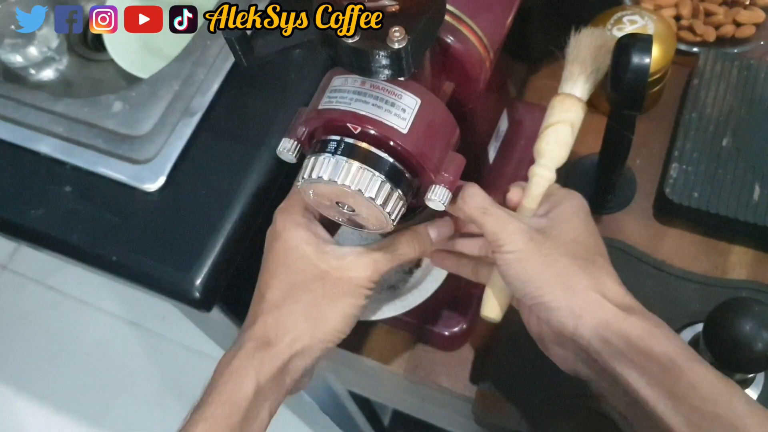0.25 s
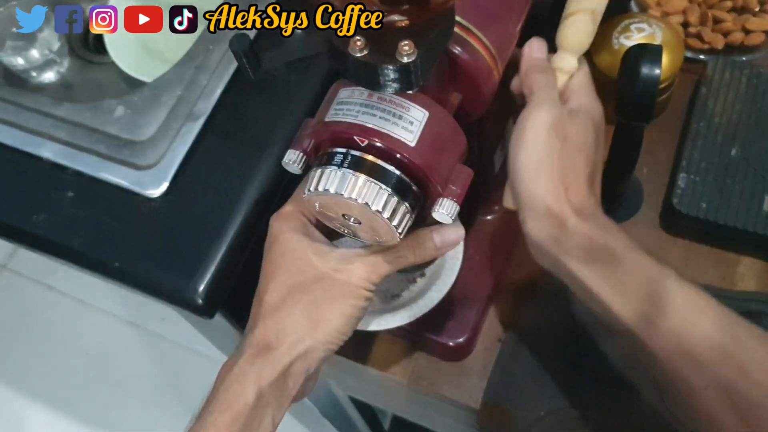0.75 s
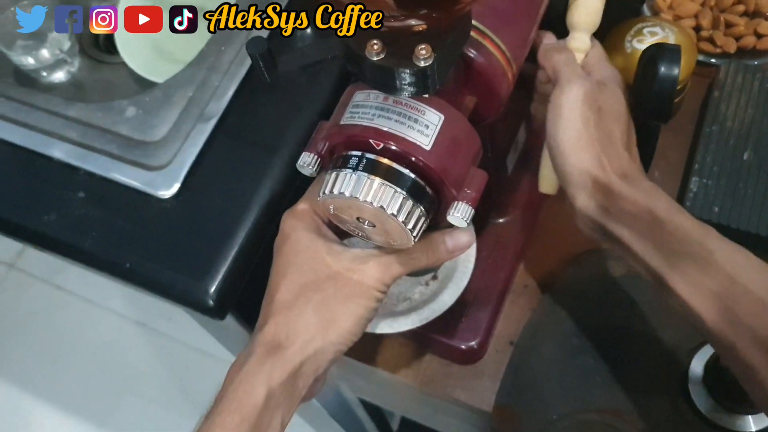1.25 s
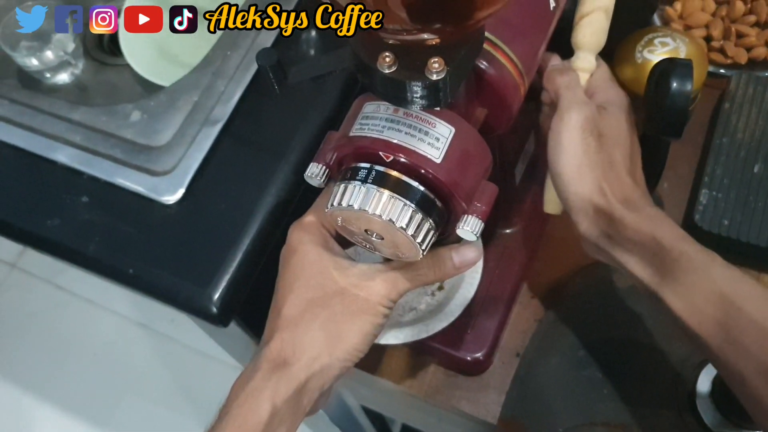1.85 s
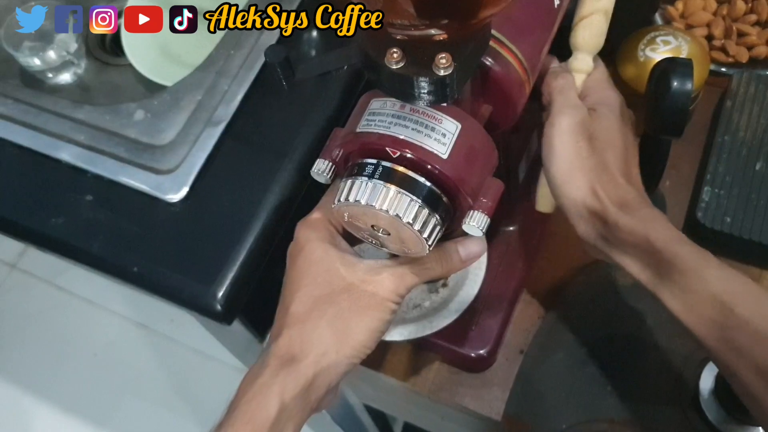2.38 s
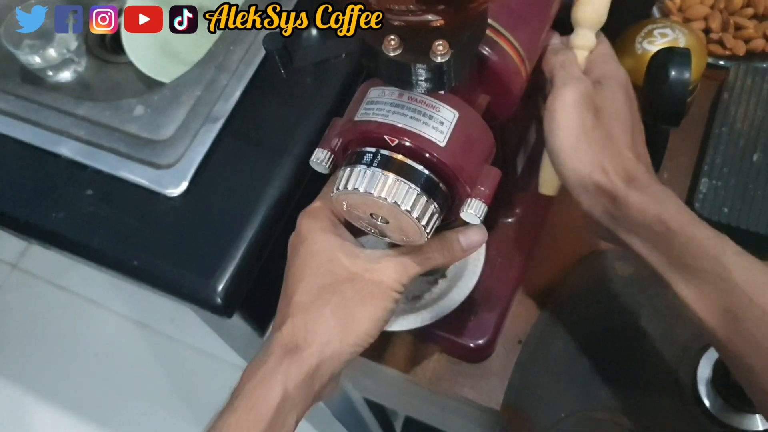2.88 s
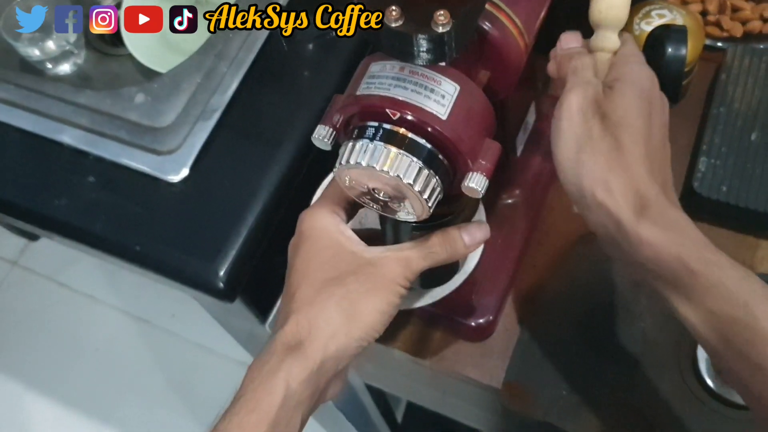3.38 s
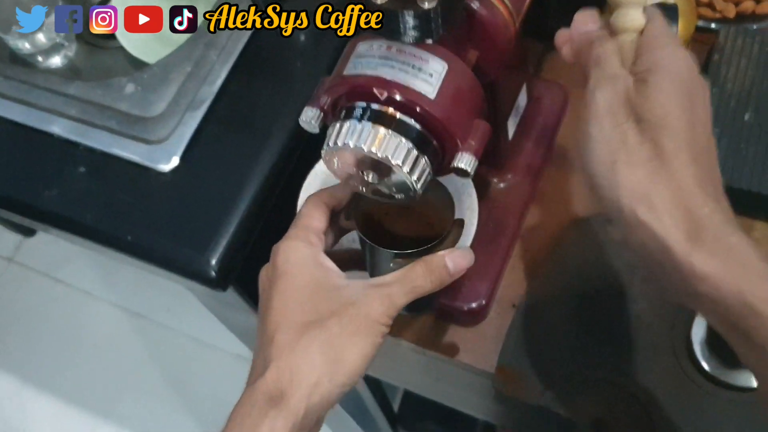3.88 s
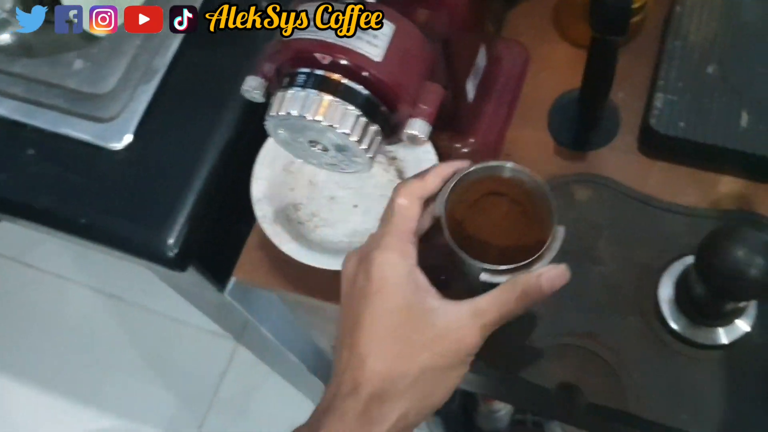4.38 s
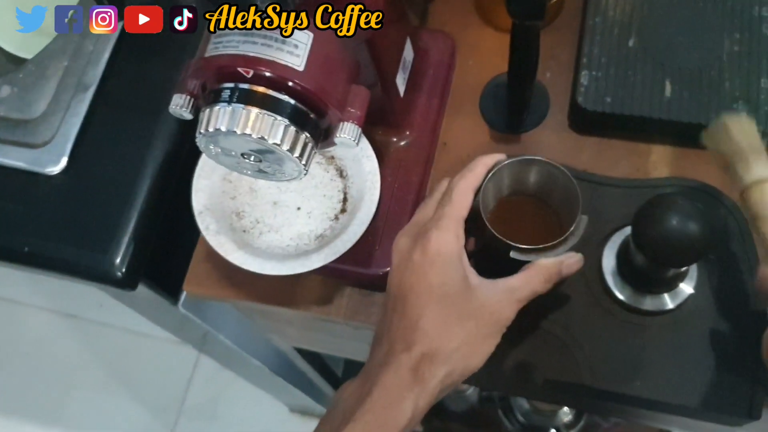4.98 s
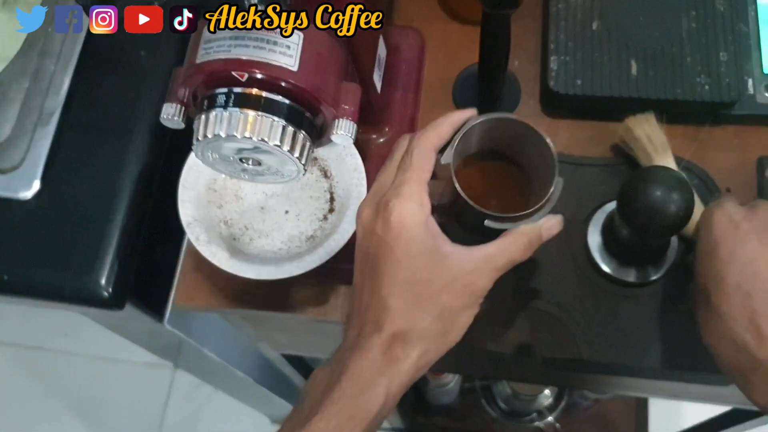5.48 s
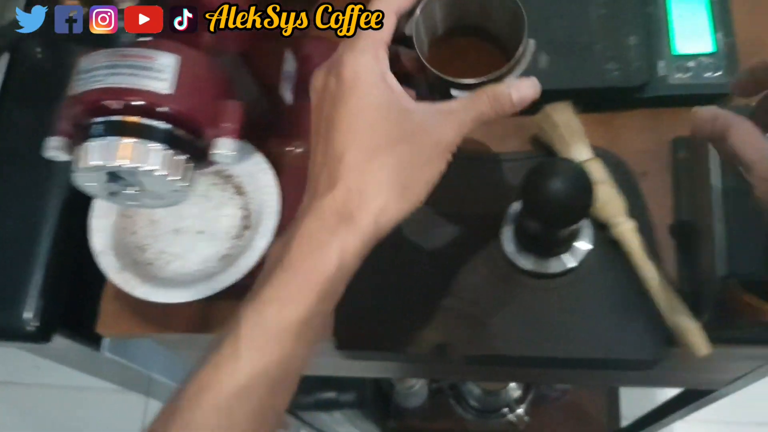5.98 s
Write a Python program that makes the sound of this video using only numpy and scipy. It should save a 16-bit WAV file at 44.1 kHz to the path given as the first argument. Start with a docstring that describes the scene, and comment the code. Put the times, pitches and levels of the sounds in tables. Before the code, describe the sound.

A quiet kitchen with soft low rumble and faint hiss, heard close in stereo with hard-room reflections. Around 0.35-0.5 s hands rustle and tiny bumps touch the grinder chute; another small bump comes at 0.9. A finger lightly touches the switch at 1.25, then it snaps loudly at 1.37. The small motor surges with a rough rumble, reaching full speed within a few tenths: steady buzzing whine, bright brush hiss, mains hum, nearly empty. At 2.43 an even sharper snap cuts the power. The hum dies at once and the whine glides steadily down, swelling through resonances, thinning into a slowing rattle and stopping by about 4.2. At 4.75 a steel cup knocks the counter hard with a doubled thud and short ring, then more softly at 4.93. Between 5.2 and 5.5 a wooden brush handle taps the counter, loudest at 5.42. Faint ticks and a low handling rustle finish near 6.

```python
"""In a hard kitchen, the small mains motor of a coffee grinder starts, runs nearly empty and coasts to rest.
Its whine is a set of sines tied to the rotor angle; filtered noise makes the brush hiss, rumble and shudder,
and steady sines make the mains hum. Clicks and noise puffs ring decaying sines for the switch, the steel cup
knocked twice on the counter (the first knock lands double), the chute and a wooden brush; hands rustle as
swells of noise, over a quiet bed of air noise."""
import sys
import numpy as np
from scipy import signal
from scipy.fft import rfft, irfft
from scipy.io import wavfile

SR = 44100
rng = np.random.default_rng(int(sys.argv[2]) if len(sys.argv) > 2 else 0)


def volts_from_decibels(level):
    """Turn decibel levels (scalar or array-like) into linear amplitude factors."""
    exponent = np.asarray(level, float) / 20
    return 10 ** exponent


def transcribe(signal):
    """Save signal, clipped to [-1, 1], as a 16-bit WAV file at the path in sys.argv[1]."""
    frames = np.atleast_2d(signal).T
    limited = np.clip(frames, -1, 1)
    pcm = np.round(limited * 32767).astype(np.int16)
    wavfile.write(sys.argv[1], SR, pcm)


N = 275163
T = np.arange(N) / SR   # time [s]
ON_S, OFF_S = 1.367, 2.435   # motor current on and off [s]
FULL_HZ = 553   # full speed: commutator bars passing per second, twelve bars a turn

# resonances of the switch and its shell: (frequency [Hz], level [dB], time to fall 60 dB [s])
SHELL = [(540, -7, 0.021), (967, -11.5, 0.017), (2100, 1, 0.0075), (2600, 4, 0.0017), (3570, -8.5, 0.012),
         (4154, -4.5, 0.0028), (5900, -3, 0.0034), (8750, -18.5, 0.0044)]


def rms_one(x):
    """Scale to an rms of 1."""
    return x / np.sqrt(np.mean(x ** 2) + 1e-20)


def at_hz(points, hz):
    """Read the second column of a table at any frequency, on a log frequency axis."""
    points = np.array(points)
    return np.interp(np.log(hz + 0.0019), np.log(points[:, 0]), points[:, 1])


def drift(rate):
    """Random wander of spread about 1: straight lines between random points, rate points per second."""
    knots = np.arange(-1, N / SR * rate + 2)
    return np.interp(T * rate, knots, rng.standard_normal(len(knots))) * np.sqrt(3 / 2)


def ring(clicks, hz, t60):
    """A resonance: each unit click starts a sine of height about 1 that falls 60 dB in t60 seconds."""
    radius = volts_from_decibels(-60 / (t60 * SR))
    step = 2 * np.pi * hz / SR
    return signal.lfilter([0, np.sin(step)], [1, -2 * radius * np.cos(step), radius ** 2], clicks + 1e-18)


def cut(x, hz, kind, order=2):
    """Butterworth filter that keeps the low, high or band part of a sound."""
    sos = signal.butter(order, np.clip(hz, 10, 20000), kind, fs=SR, output="sos")
    return signal.sosfilt(sos, x)


def pan(x, db):
    """Place a sound by making left louder than right by db."""
    return x * volts_from_decibels(np.array([[db / 2], [-db / 2]]))


def widen(mid, side):
    """Mix a common and an unrelated noise into left and right, less alike in the treble."""
    # how alike left and right are: (frequency [Hz], likeness [-1 to 1])
    likeness = [(60, .92), (400, .9), (800, .6), (1300, 0), (2200, .45), (4000, -.1), (12000, -.2)]
    alike = np.clip(at_hz(likeness, np.fft.rfftfreq(mid.shape[-1], 1 / SR)), -1, 1)
    common = rfft(mid) * np.sqrt((1 + alike) / 2)
    unlike = rfft(side) * np.sqrt((1 - alike) / 2)
    return irfft(np.array([common + unlike, common - unlike]), mid.shape[-1])


def taps(events, modes, pan_db=0.0, crack_db=-17.0):
    """A click and a short puff of noise, as bright as the contact is hard, ring a body and are heard bare too."""
    out = np.zeros(N)
    for start, db, low_hz, high_hz, contact in events:
        puff = rng.standard_normal(8000) * np.exp(-np.arange(8000) / SR / contact)
        puff[0] = np.sqrt(contact * SR)   # the click carries most of the energy
        puff = cut(puff, [low_hz, high_hz], "band", order=3)
        body = 0
        for k, (hz, level_db, t60) in enumerate(modes):
            body = body + volts_from_decibels(level_db) * ring(puff, hz, t60) * (-1) ** k   # neighbours in opposite phase
        tap = body / np.abs(body).max() + volts_from_decibels(crack_db) * puff / np.abs(puff).max()
        at = round(start * SR)
        out[at:at + 8000] += volts_from_decibels(db) * tap
    return pan(out, pan_db)


def air():
    """Distant rumble of the house and hiss of the microphone: noise shaped by a spectrum table."""
    # spectrum of the air noise: (frequency [Hz], relative level [dB per Hz])
    spectrum = [(15, -30.5), (25, -20), (53, -3), (70, -21), (87, -1), (166, -3), (229, 6), (263, -9.5),
                (427, -6), (503, -10.5), (591, -10.5), (734, -15), (3340, -35), (8500, -41), (12000, -34.5),
                (16000, -35.5)]
    shape = volts_from_decibels(at_hz(spectrum, np.fft.rfftfreq(N, 1 / SR)))
    noise = irfft(rfft(rng.standard_normal((2, N))) * shape, N)
    low = cut(noise, 1100, "low") * volts_from_decibels(2.9 * drift(2.7))   # the rumble swells and sinks
    high = cut(noise, 840, "high")
    return pan(volts_from_decibels(-63) * rms_one(widen(*(low + high))), -1.6)


def rustles():
    """Hands and bristles rustle: bands of grainy noise that swell and fade."""
    # rustles: (middle [s], length [s], level at the top of the swell [dB], low edge [Hz], high edge [Hz])
    swells = [(0.356, 0.021, -53.5, 367.2, 444.4), (0.379, 0.034, -50, 414, 636),
              (0.48, 0.1, -65, 800, 2360), (0.96, 0.12, -74.5, 658.8, 2592), (7.7, 0.13, -69, 1200, 2160),
              (3.34, 0.068, -63, 7407, 8800), (5.675, 0.14, -73, 5300, 15000),
              (5.946, 0.1, -74.5, 1300, 2200), (6.076, 0.16, -57.5, 38.89, 83)]
    out = 0
    grains = rng.standard_normal((2, N)) * volts_from_decibels(2 * drift(150))
    for middle, length, db, low_hz, high_hz in swells:
        noise = rms_one(cut(grains, [low_hz, high_hz], "band"))
        out = out + volts_from_decibels(db) * noise * np.exp(-(2 * (T - middle) / length) ** 2)
    return out


def chute_bumps():
    """Small bumps ring the grinder's chute."""
    # bumps: (time [s], level [dB], contact low edge [Hz], contact high edge [Hz], contact decay [s])
    bumps = [(.369, -52, 2600, 8000, 0.0018), (.376, -43, 2640, 13000, .003), (.43, -40, 336, 2600, .012),
             (.451, -45, 500, 2000, .02), (.877, -46, 130, 700, 0.0036), (1.643, -33.5, 300, 800, .002),
             (2.231, -33, 304, 700, .002)]
    # resonances of the chute: (frequency [Hz], level [dB], time to fall 60 dB [s])
    chute = [(200, 0.5, 0.04), (490, -3, 0.012), (700, -9.5, .05), (1080, -3.5, 0.0037), (1550, -7, .008),
             (2010, -11.5, 0.021), (2850, -13, .005), (5700, -8, 0.0016), (9000, -11.5, 0.0011)]
    return taps(bumps, chute)


def finger_touch():
    """A finger lands on the switch: a puff of noise is heard as strongly as the ringing shell."""
    # touch: (time [s], level [dB], contact low edge [Hz], contact high edge [Hz], contact decay [s])
    touch = [(1.245, -32.5, 1000, 15670, 0.0066)]
    return taps(touch, SHELL, crack_db=0.0)


def switch():
    """The rocker snaps over in a short rattle that rings its shell and cracks across all pitches."""
    # rocker switched on and off: (time [s], level [dB], left over right [dB])
    snaps = [(1.366, -8.5, -1), (2.433, -6.5, -0.5)]
    out = np.zeros((2, N))
    for start, db, pan_db in snaps:
        after = np.maximum(T - start, 0)
        burst = rng.standard_normal((2, N)) * after * np.exp(-after / 0.002)
        burst[:, round((start + .0015) * SR)] = .008   # the spring lands with one hard click
        snap = 0
        for k, (hz, level_db, t60) in enumerate(SHELL):
            snap = snap + volts_from_decibels(level_db) * ring(burst[0], hz, t60) * (-1) ** k
        crack = cut(burst[1], [1200, 12000], "band", order=1)
        both = snap / np.abs(snap).max() + volts_from_decibels(3.5) * crack / np.abs(crack).max()
        out += pan(volts_from_decibels(db) * both, pan_db)
    return out


def bars_hz():
    """Rotor speed in bars per second: it closes in on full speed, then friction and drag slow it."""
    # shortfall after switching on, dying in three stages: (shortfall [bars per s], time constant [s])
    spin_up = [(363, .015), (184, .095), (6, .5)]
    since_on = np.maximum(T - ON_S, 0)
    rising = FULL_HZ - sum(hz * np.exp(-since_on / fade) for hz, fade in spin_up)
    friction, drag = 247.5, .35   # steady braking [bars per s, per s]; braking in step with speed [per s]
    floor = friction / drag
    falling = (FULL_HZ + floor) * np.exp(-drag * np.maximum(T - OFF_S, 0)) - floor
    return np.maximum(np.minimum(rising, falling), 1)


def running_db(db, surge, loss_db, freed_db=0, creep_hz=25):
    """Level over time: a surge (dB, time constant s) at the start, then a loss as the coasting speed halves."""
    off = T > OFF_S
    # creep_hz keeps the loss finite near standstill
    halvings = np.log2((FULL_HZ + creep_hz) / (bars_hz() + creep_hz)) * off
    start_db = surge[0] * np.exp(-np.maximum(T - ON_S, 0) / surge[1])
    return db + start_db + freed_db * off - loss_db * halvings   # freed_db: step when the current stops


def housing(hz):
    """Gain of the housing: resonances added in power."""
    # housing resonances: (frequency [Hz], width [Hz], level [dB])
    peaks = [(110, 35, -13.5), (188, 12, -3.5), (312, 230, -7.5), (441, 90, -10), (508, 30, -9),
             (627, 120, -13), (891, 72, -18), (1480, 730, -17.5), (2243, 480, -9.5), (3920, 790, -20),
             (5540, 630, -11), (6393, 480, -8.5), (8780, 550, -13.5), (10000, 1800, -18),
             (10900, 9500, -20.5), (13700, 2000, -33)]
    power = sum(volts_from_decibels(2 * db) / (1 + (2 * (hz - top) / width) ** 2) ** 2 for top, width, db in peaks)
    return np.sqrt(power + 1e-5)


def commutator_whine(turns, angle):
    """Sines locked to the rotor angle swell as they glide through the housing resonances."""
    # whine partials: pitch of each [cycles per turn]
    cycle_counts = [1, 6, 9, 10, 12, 20, 24, 36, 48, 72, 96, 120, 132, 144, 168, 192, 216, 240, 252, 264,
                    312]
    # their relative levels at full speed, same order: (powered [dB], coasting [dB])
    partial_levels = [(-62, -62), (-54, -65), (-59, -67), (-54, -60), (-53.5, -46), (-59, -69), (-64, -65),
                      (-58.5, -71), (-55, -36.5), (-65, -70.5), (-66, -71), (-59, -60), (-66, -68),
                      (-65, -56), (-70, -57), (-60, -55), (-53, -63), (-63, -63), (-68, -70), (-70, -67),
                      (-60, -70)]
    # colour of the way out through the shell, on top of the housing: (frequency [Hz], level [dB])
    way_out = [(150, 0), (205, 8), (250, -7), (300, 3), (550, 1), (680, -4), (800, 1), (950, 2),
               (1150, -10), (1400, -11), (1650, 0), (1950, 7), (2400, 1), (2700, -9), (4700, -8), (5000, 0),
               (10100, 0), (10600, 13), (11000, 0)]
    grid = np.arange(0, SR / 2, 5.)
    gain = housing(grid) * volts_from_decibels(at_hz(way_out, grid))
    current = np.exp(-np.maximum(T - OFF_S, 0) / 0.036)   # magnetic partials die with the current
    mains = 2 * np.pi * 100 * T   # the current pulses twice a mains cycle and shakes the whine
    whine = 0
    for cycles, (on_db, off_db) in zip(cycle_counts, partial_levels):
        colour = np.interp(cycles * turns, grid, gain) / np.interp(cycles * turns.max(), grid, gain)
        unsteady_db = (3.5 - 2.5 * current) * drift(10) + 1.5 * drift(45)
        level = volts_from_decibels(off_db + (on_db - off_db) * current + unsteady_db)
        # partials near the bar rate are shaken most
        shake = 1.7 * current * min(cycles / 12, 12 / cycles) ** 4
        wander = .4 * drift(20) + cycles / 350 * drift(50) + rng.uniform(0, 7)
        whine = whine + level * colour * (1 + shake * np.sin(mains)) * np.sin(cycles * angle + wander)
    # the whine emerges as the rotor settles
    whine_db = running_db(4.5, (-45, .085), 6.5, freed_db=-9)
    return np.sqrt(2) * whine * volts_from_decibels(whine_db) * np.clip((3.68 - T) / .2, 0, 1)   # at last too slow to sing


def mains_hum():
    """Magnetic hum: steady sines at multiples of twice the mains frequency, fading after switching off."""
    # hum: (frequency [Hz], level [dB])
    tones = [(100, -55), (200, -43), (300, -48.5), (600, -46)]
    hum = 0
    for hz, db in tones:
        hum = hum + np.sqrt(2) * volts_from_decibels(db + drift(6)) * np.sin(2 * np.pi * hz * T + rng.uniform(0, 7))
    rise = np.clip((T - ON_S) / .15, 0, 1)
    return hum * rise * np.exp(-np.maximum(T - OFF_S, 0) / .06)   # the housing rings on


def through_housing(noise):
    """Colour a noise with the gain of the housing."""
    return irfft(rfft(noise) * housing(np.fft.rfftfreq(N, 1 / SR)), N)


def burr_rattle(angle):
    """Loose burrs rattle once a turn: pulsing noise heard as a rumble and a low shudder of the base."""
    noise = rng.standard_normal((2, N)) * volts_from_decibels(2.5 * drift(60)) * (1 + .3 * np.sin(angle))
    noise = through_housing(noise)
    rumble = widen(*rms_one(cut(cut(noise, 950, "low", order=3), 400, "high"))) * np.sqrt(2)
    shudder = rms_one(cut(noise[0], [60, 330], "band"))
    rumble_db = running_db(-42.5, (11, 0.063), 12)
    shudder_db = running_db(-48.5, (7, 0.1), 4)
    return volts_from_decibels(rumble_db) * rumble + volts_from_decibels(shudder_db) * shudder


def brush_hiss(angle):
    """The motor brushes scrape bar by bar: noise pulsing twelve times a turn."""
    noise = rng.standard_normal((2, N)) * volts_from_decibels(0.21 * drift(30)) * (1 + 0.14 * np.sin(12 * angle))
    noise = through_housing(noise)
    bright = rms_one(cut(noise, 3000, "high", order=3))
    dull = rms_one(cut(noise, [1850, 3000], "band", order=3))
    surge = (1.9, 0.17)
    bright_db = running_db(-45.5, surge, 11, freed_db=1)   # lifts when the current stops
    dull_db = running_db(-50.5, surge, 8.5)   # the dull part outlasts the bright part
    return widen(*(volts_from_decibels(bright_db) * bright + volts_from_decibels(dull_db) * dull)) * np.sqrt(2)


def motor(pan_db=-1.0):
    """The rotor's angle drives whine, rattle and hiss; the hum follows the current."""
    turns = bars_hz() / 12   # turns per second
    angle = 2 * np.pi * np.cumsum(turns) / SR
    turning = np.clip((T - ON_S) / 0.013, 0, 1) * np.clip((4.25 - T) / 0.066, 0, 1)
    running = commutator_whine(turns, angle) + burr_rattle(angle) + brush_hiss(angle)
    return pan(turning * running + mains_hum(), pan_db)


def ticks():
    """Each faint high tick is a tap on one tiny resonance."""
    # ticks: (time [s], level [dB], frequency [Hz])
    tick_list = [(4.14, -57.5, 6430), (5.314, -58, 9000), (5.904, -55, 9000)]
    return sum(taps([(s, db, hz / 2, hz * 3.1, .002)], [(hz, 0, .002)]) for s, db, hz in tick_list)


def cup(pan_db=-0.5):
    """Each knock is a soft push that rings counter and cup, with a crack of rim and grounds on top."""
    # cup on the counter: (time [s], ringing level [dB], push low-pass edge [Hz], crack level [dB])
    knocks = [(4.747, -2.5, 972, -18.5), (4.752, -7, 3020, -27), (4.933, -6, 840, -29)]
    # resonances of counter and cup: (frequency [Hz], level [dB], time to fall 60 dB [s])
    modes = [(148, -7.5, 0.38), (200.2, -11, 0.4), (265, 4, 0.043), (344, -7.5, 0.03), (416, 8.5, 0.023),
             (517, -10.5, 0.093), (600, -6.5, 0.042), (776, -10.5, 0.07), (1090, 1, 0.0072),
             (1497, -14, 0.067), (1530, 5, 0.0063), (1940, -1, 0.034), (2200, -5, 0.028),
             (2650, -5.5, 0.015), (3660, -23, 0.0092), (5616, -15, 0.18), (7260, -41.5, 0.071)]
    out = np.zeros(N)
    for start, db, soft_hz, crack_db in knocks:
        push = np.zeros(N)
        push[round(start * SR)] = -1
        push = cut(push, soft_hz, "low")
        knock = sum(volts_from_decibels(level_db) * ring(push, hz, t60) for hz, level_db, t60 in modes)
        knock = cut(knock, 135, "high", order=3)
        crack = rng.standard_normal(N) * (T > start) * np.exp(-np.abs(T - start) / .006)
        crack = cut(cut(crack, 700, "high"), 1000, "low", order=1)
        out += volts_from_decibels(db) * knock / np.abs(knock).max() + volts_from_decibels(crack_db) * crack / np.abs(crack).max()
    return pan(out, pan_db)


def brush_taps():
    """A wooden brush handle taps the counter and both ring briefly."""
    # taps: (time [s], level [dB], contact low edge [Hz], contact high edge [Hz], contact decay [s])
    touches = [(5.19, -41.5, 810, 2900, 0.0024), (5.29, -35.5, 1190, 5170, 0.00024),
               (5.422, -27, 600, 10000, 0.011), (5.488, -41, 120, 600, 0.016),
               (5.505, -39, 295, 2500, 0.008)]
    # resonances of handle and counter: (frequency [Hz], level [dB], time to fall 60 dB [s])
    handle = [(202, 6.5, 0.089), (450, -2, 0.032), (810, 8.5, 0.0039), (1254, 5, 0.0038), (1830, -7, 0.011),
              (2290, -17.5, 0.011), (2730, -8, 0.004), (4900, -18, 0.004), (9900, -2.5, 0.000235)]
    return taps(touches, handle)


def kitchen(x):
    """Reflections: noise that dies away band by band, arriving after a few milliseconds."""
    # reverberation: (frequency [Hz], time to fall 60 dB [s])
    decay = [(100, 0.65), (300, 0.61), (1000, 0.78), (3000, 0.68), (7000, 0.55), (15000, 0.62)]
    t, tail = T[:SR], 0
    edges = 50 * 2. ** np.arange(0, 9, .5)   # half-octave bands
    for low, high in zip(edges, edges[1:]):
        t60 = at_hz(decay, np.sqrt(low * high))
        tail = tail + cut(rng.standard_normal((2, SR)), [low, high], "band") * volts_from_decibels(-60 * t / t60)
    tail = widen(*(tail * np.clip((t - .003) / 0.001, 0, 1)))
    return signal.fftconvolve(x, tail / np.sqrt(np.sum(tail ** 2) / 2), axes=1)[:, :N]


def scene():
    """Blows excite the kitchen; the motor is close, so its reflections are weaker."""
    grinder, clicks, knocks = motor(), switch(), cup()
    small = chute_bumps() + brush_taps() + finger_touch() + ticks()
    wet = volts_from_decibels(-7.0) * cut(grinder, 520, "high")
    wet = wet + volts_from_decibels(-3.5) * clicks
    wet = wet + volts_from_decibels(-2.5) * cut(knocks, 250, "high", order=1)
    wet = wet + volts_from_decibels(-3.0) * small
    return grinder + clicks + knocks + small + kitchen(wet) + rustles() + air()


def roll_off(x):
    """The treble ends steeply here."""
    return signal.sosfilt(signal.butter(12, 16800, fs=SR, output="sos"), x)


def record(dry):
    """Two microphone ports a little apart lose the deepest bass and the very top."""
    # left over right microphone: (frequency [Hz], level [dB])
    balance = [(2000, -2), (5000, -0.5), (8000, -4), (12000, -3)]
    # how far the left microphone leads: (frequency [Hz], phase [radians])
    lead = [(200, 0), (800, .4), (2240, .6), (4000, 1.6), (16000, 1.6)]
    hz = np.fft.rfftfreq(N, 1 / SR)
    half = volts_from_decibels(at_hz(balance, hz) / 2) * np.exp(.5j * at_hz(lead, hz))   # half the difference to each side
    ports = irfft(rfft(dry) * np.array([half, 1 / half]), N)
    ports = cut(ports, 15700, "low", order=30)
    return roll_off(cut(ports, 46, "high"))


dry = scene()
out = record(dry)
transcribe(out)
```